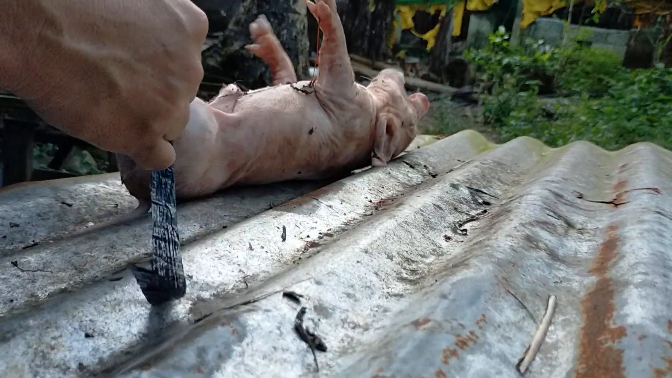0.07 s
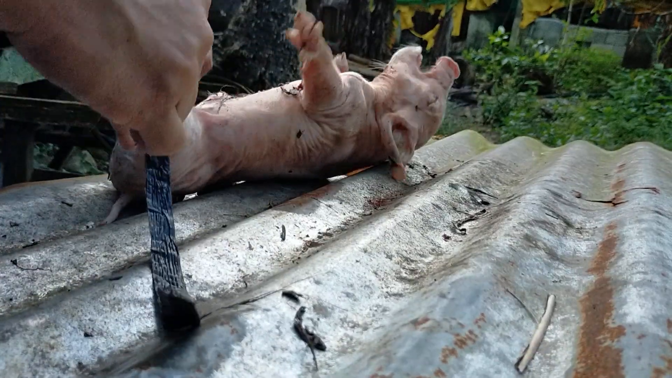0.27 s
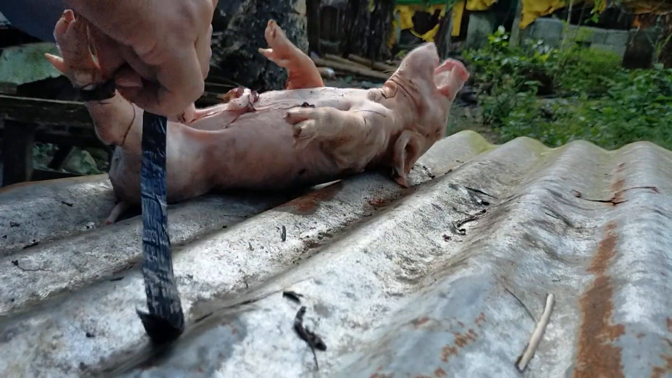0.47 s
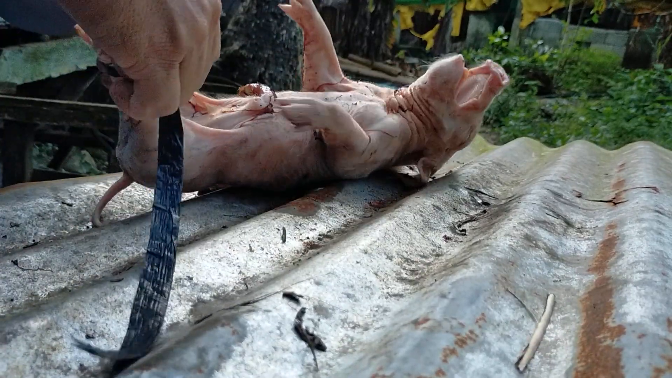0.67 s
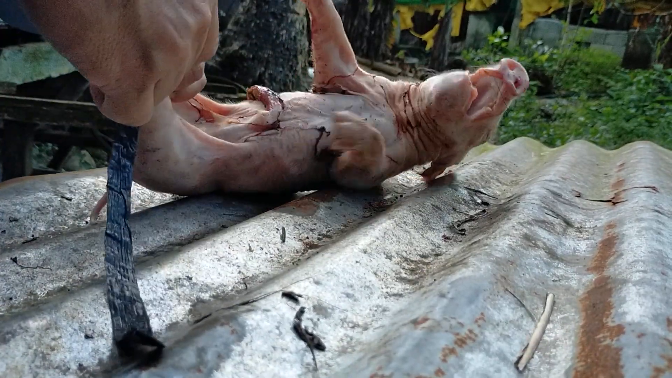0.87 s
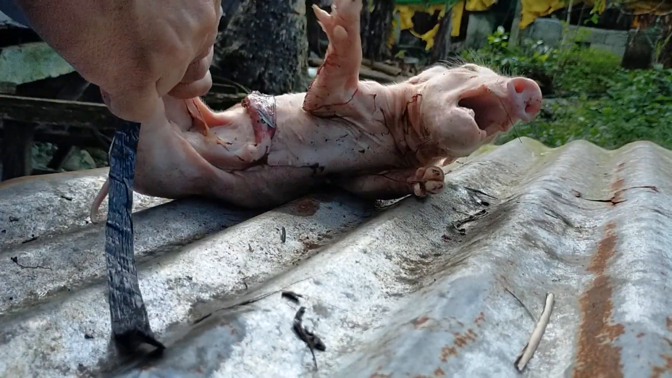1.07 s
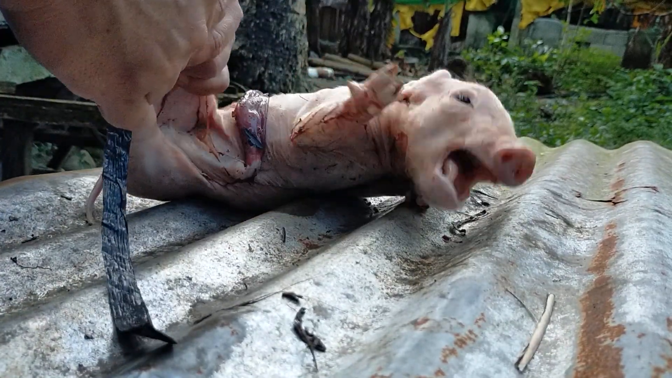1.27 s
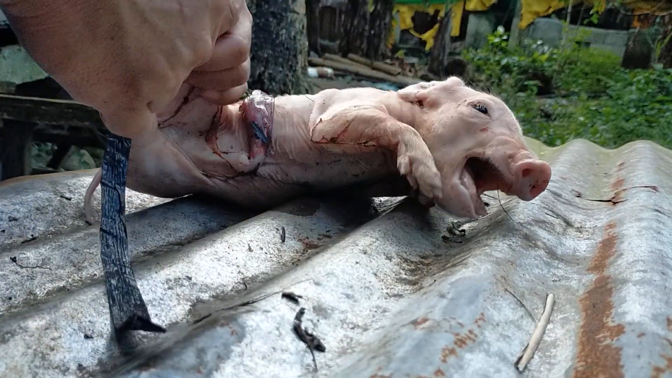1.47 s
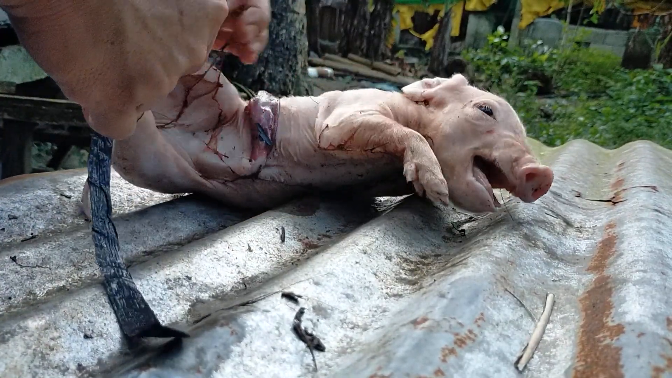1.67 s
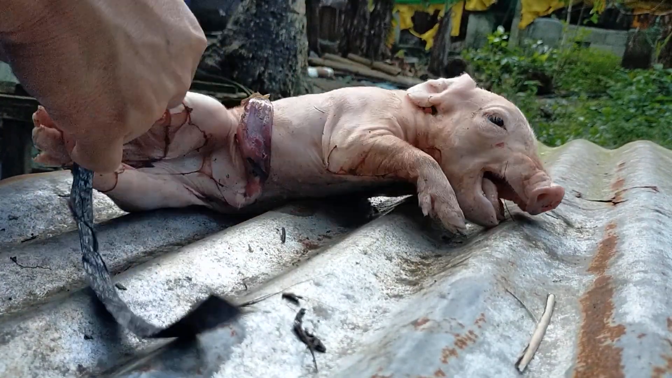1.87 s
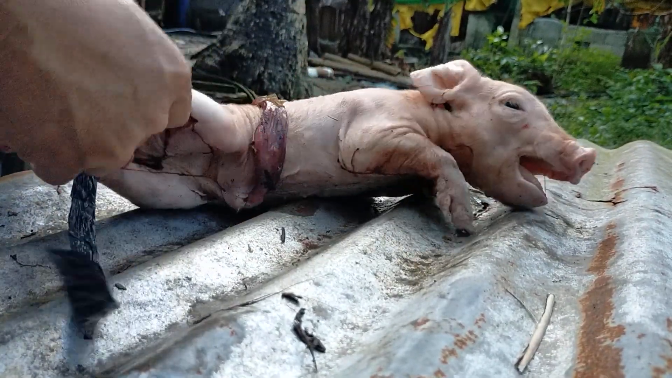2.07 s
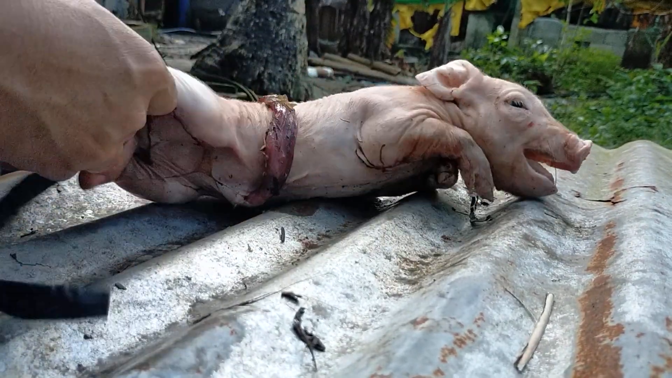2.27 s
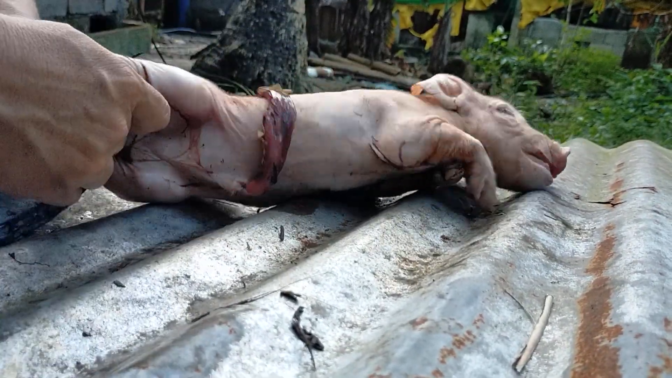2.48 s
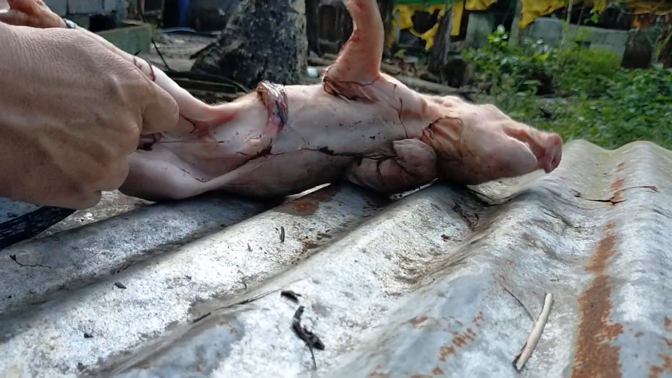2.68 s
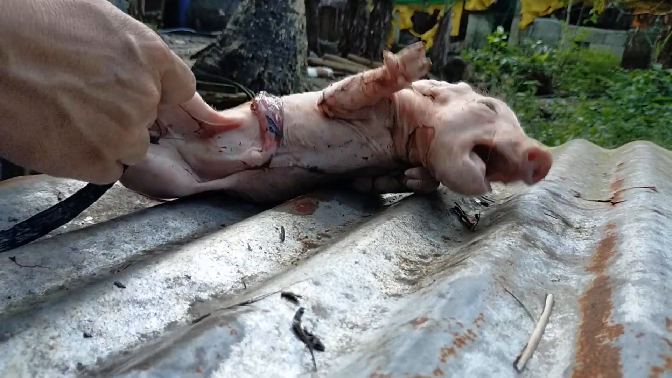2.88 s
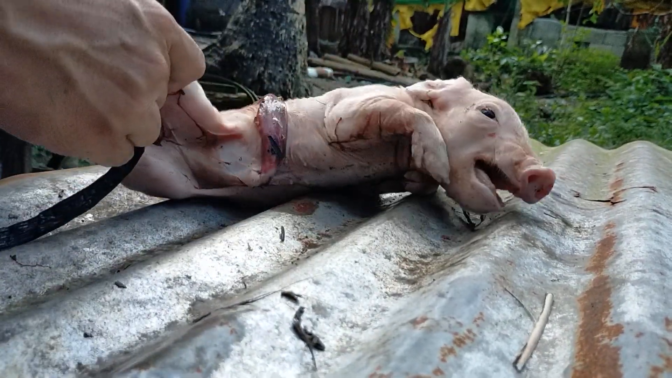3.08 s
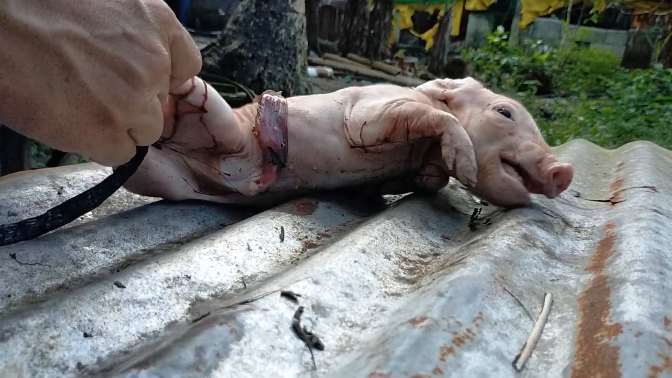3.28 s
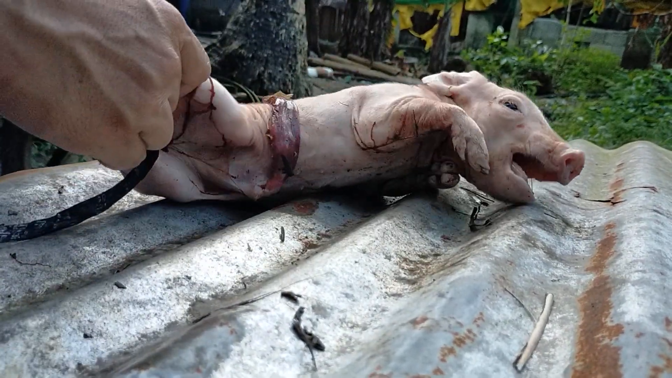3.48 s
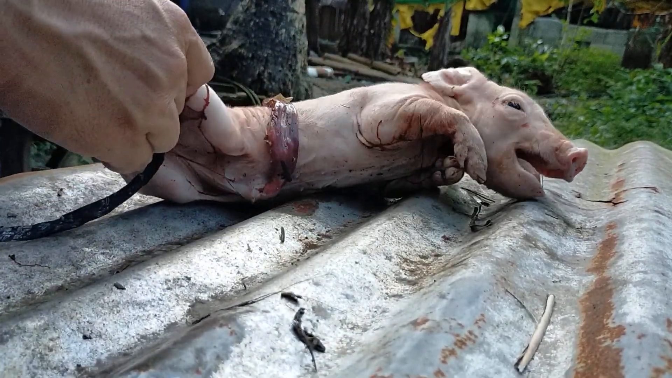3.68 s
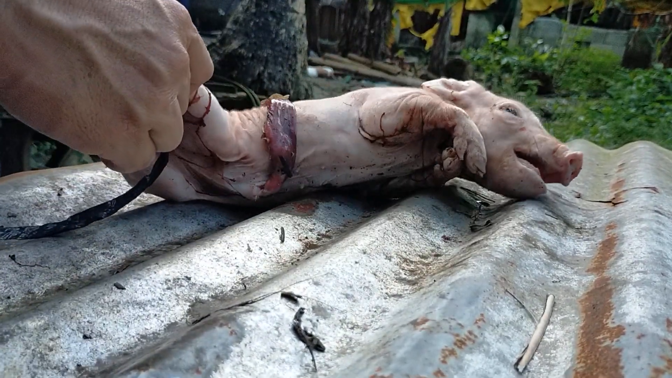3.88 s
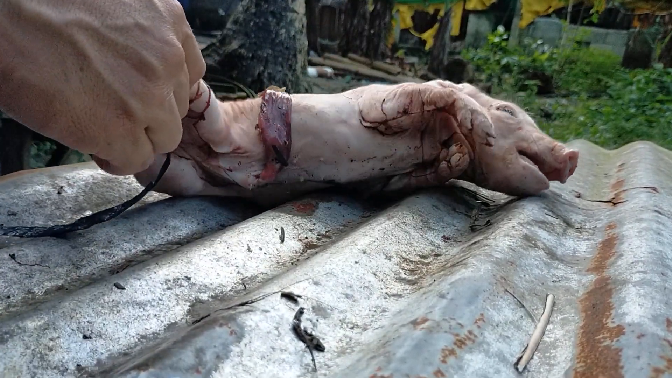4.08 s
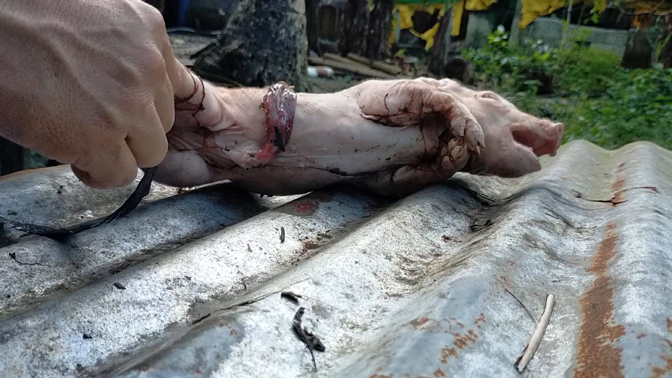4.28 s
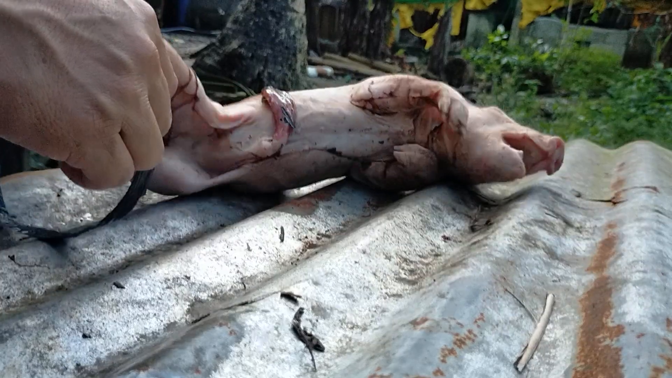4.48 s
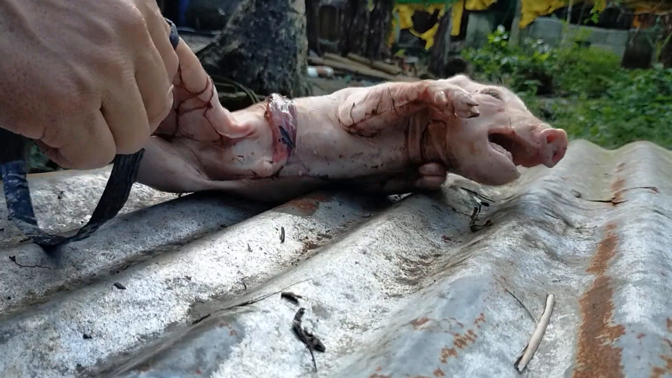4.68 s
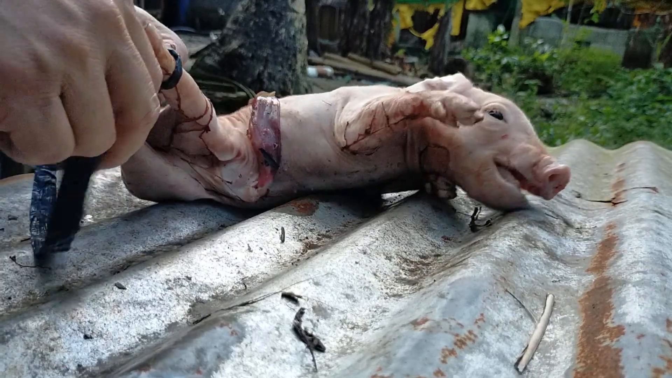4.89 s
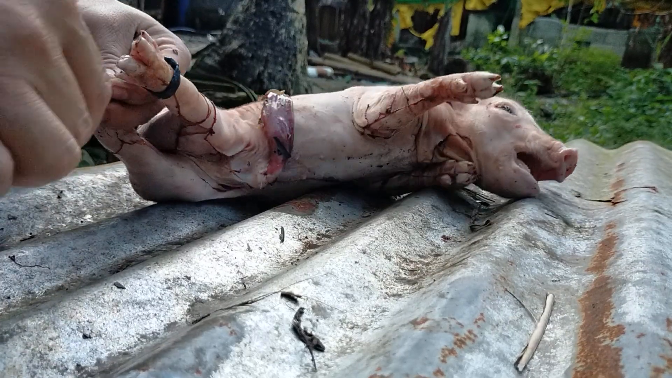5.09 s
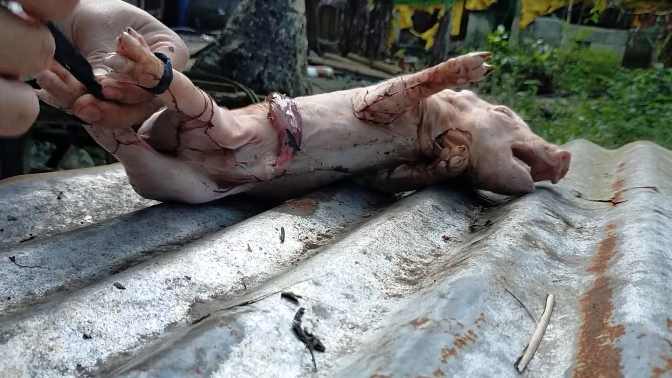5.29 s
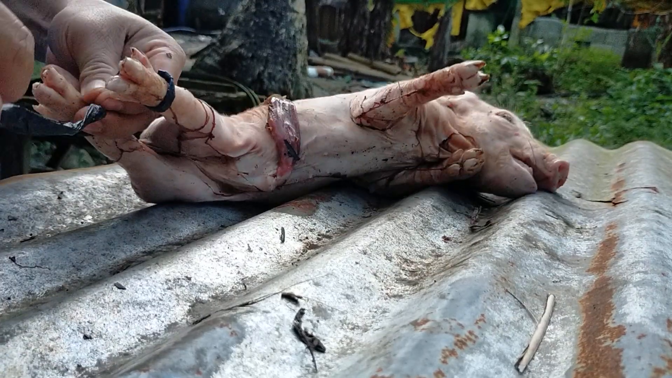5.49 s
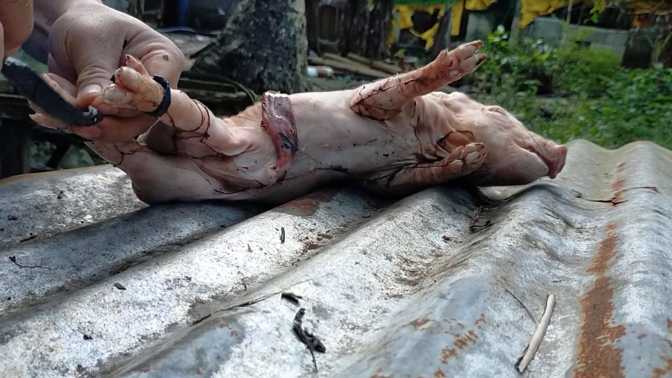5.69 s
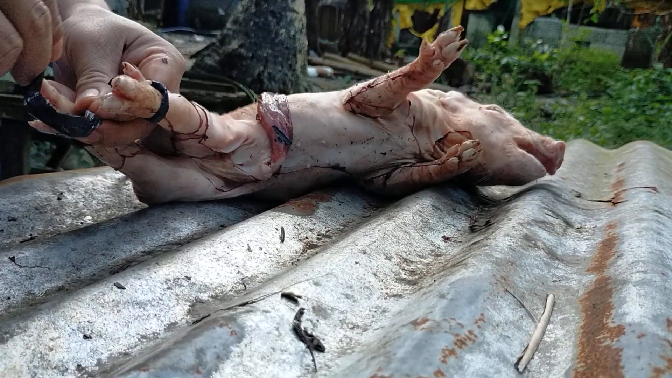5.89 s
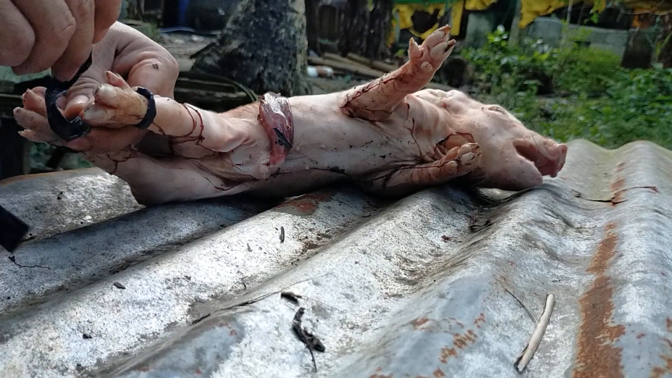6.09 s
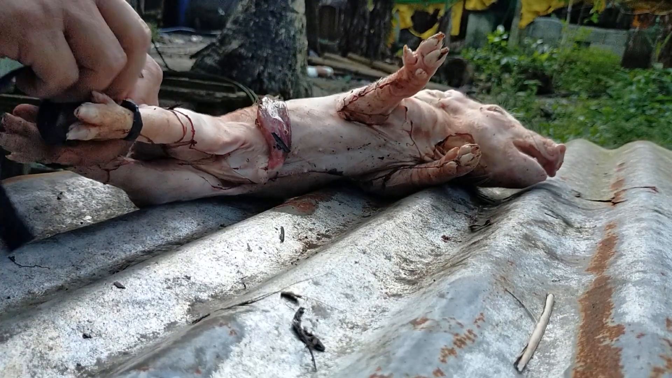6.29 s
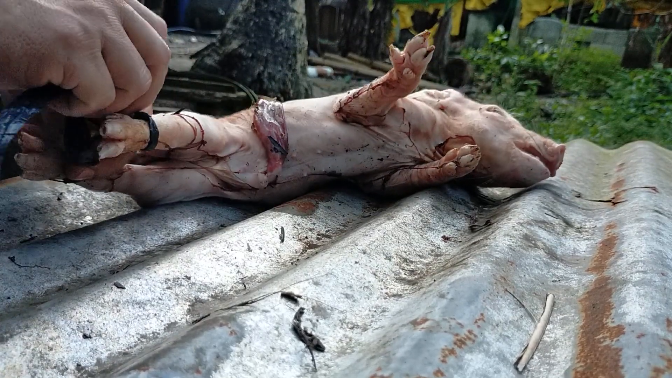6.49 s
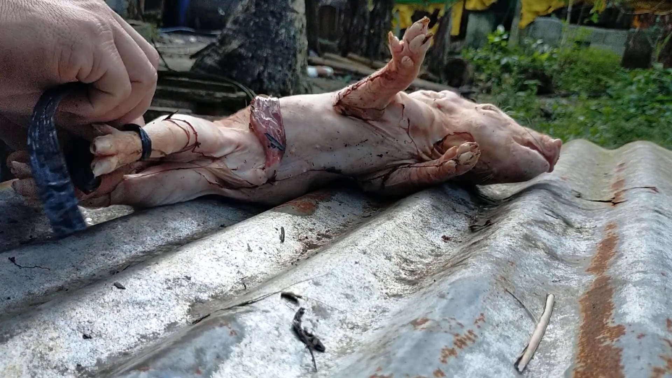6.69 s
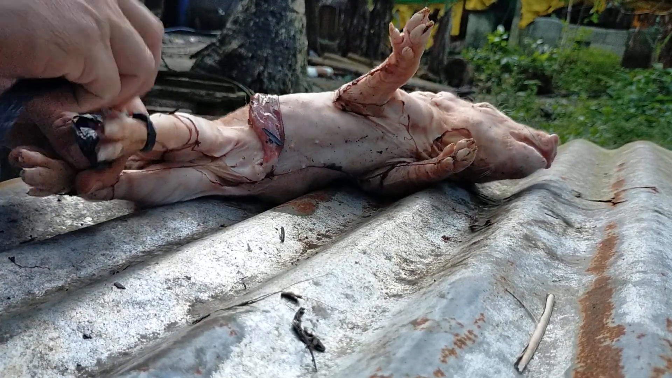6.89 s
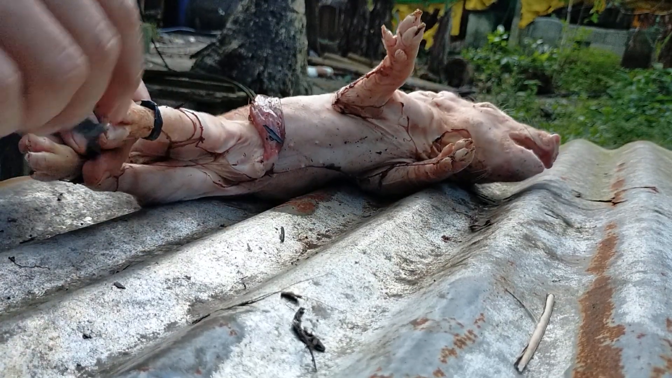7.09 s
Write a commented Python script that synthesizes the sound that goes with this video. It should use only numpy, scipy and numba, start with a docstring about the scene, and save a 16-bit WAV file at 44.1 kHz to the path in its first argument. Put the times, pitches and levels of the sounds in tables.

```python
"""Piglet squealing on a roofing sheet

A piglet held down on a corrugated sheet outdoors cries out again and again, close by.
Each cry is a creak of glottal pulses ringing mouth, nose and snout resonances. Most cries tighten
into a ringing squeal, and some squeals break into a rasp as extra pulses and leaking air come in.
Faint grunts are rough pulses; kicks ring sheet modes and noise bands; handling ticks are noise bursts.
Quick reflections, faint echoes, quiet air and a steady high hiss surround them."""
import sys
import numpy as np
from scipy import signal
from scipy.fft import rfft, irfft
from scipy.io import wavfile
from scipy.ndimage import uniform_filter1d, minimum_filter1d
from numba import njit

SR = 44100
rng = np.random.default_rng(int(sys.argv[2]) if len(sys.argv) > 2 else 0)


def inscribe(sig):
    """Save sig as 16-bit PCM at rate SR to the path in sys.argv[1].

    A 1-D sig is mono; a 2-D sig holds one channel per row.
    Samples are clipped to [-1, 1] before scaling.
    """
    pcm = np.round(np.clip(np.atleast_2d(sig).T, -1, 1) * 32767)
    wavfile.write(sys.argv[1], SR, pcm.astype(np.int16))


N = 314874
TIME = np.arange(N) / SR


def from_db(db):
    """Decibels to gain."""
    return 10 ** (np.asarray(db) / 20)


def rms_one(x):
    """Scale to unit power."""
    return x / np.sqrt(np.mean(x ** 2) + 1e-20)


def even(x, size=760):
    """Hold the power at one over a few pulses."""
    power = uniform_filter1d(uniform_filter1d(x * x, size), size)
    return x / np.sqrt(np.maximum(power, 0) + 1e-12)


def ramp(start, length):
    """From zero to one, starting at a given time."""
    return np.clip((TIME - start) / max(length, 1e-3), 0, 1)


def sounding(events, fade_s=0.0035):
    """One while any of the events lasts, with short fades."""
    gate = 0
    for start, length, *_ in events:
        inside_s = np.minimum(TIME - start, start + length - TIME)
        gate = gate + np.clip(inside_s / fade_s + 1, 0, 1)
    return gate


def band(x, hz, kind, order=2):
    """Butterworth filter."""
    sos = signal.butter(order, np.clip(hz, 10, .45 * SR), kind, fs=SR, output="sos")
    return signal.sosfilt(sos, x + 1e-18)


@njit
def glide(x, hz, width):
    """Two-pole resonance whose centre and width move; gain 1 on top."""
    y = np.zeros(len(x))
    for i in range(2, len(x)):
        r = np.exp(-np.pi * width[i] / SR)
        drive = (1 - r * r) / 2 * (x[i] - x[i - 2])
        y[i] = drive + 2 * r * np.cos(2 * np.pi * hz[i] / SR) * y[i - 1] - r * r * y[i - 2]
    return y


def resonate(x, hz, width):
    """Resonance with steady or moving centre and width."""
    return glide(x + 1e-18, hz + np.zeros(N), np.maximum(width, 3) + np.zeros(N))


def resonate_twice(x, hz, width, skirt):
    """A resonance then a broader one, which softens the attack and darkens the valleys."""
    return resonate(resonate(x, hz, width), hz, skirt)


def drift(rate_hz):
    """Smooth chance of spread about 1."""
    return rms_one(band(rng.standard_normal(N + SR), rate_hz, "low")[SR:])


def clicks(times, heights):
    """Single impulses."""
    out = np.zeros(N)
    np.add.at(out, np.clip((np.asarray(times) * SR).astype(int), 0, N - 1), heights)
    return out


def bursts(times, db, t60, edges_hz):
    """Noise in one band that starts at each hit and dies away."""
    decay = from_db(-60 / (t60 * SR))
    fall = signal.lfilter([1], [1, -decay], clicks(times, from_db(db)) + 1e-18)
    noise = band(fall * rng.standard_normal(N), edges_hz, "band", order=3)
    return noise * np.sqrt(SR / 2 / (edges_hz[1] - edges_hz[0]))


# Strain brightens and roughens together. Each row: relative treble in dB, rasp from 0 to 1.
STRAIN_RASP = [(-19, 0.01), (-8.5, .16), (-1, 0.6), (6, .85)]
# Air between slow pulses: share at cry start, share once settled.
AIR_AT_START, AIR_SETTLED = 0.43, 0.78
SHIMMER_DB = 1.5  # slow pulses come in uneven strengths


def squeals():
    """Glottal pulses ring the mouth, nose, throat and snout; slack folds also leak air."""
    rate, first_hz, level_db, second_db, treble_db, hiss_db, chest_db, settled, tongue = voice()
    rasp = np.clip(np.interp(treble_db, *np.transpose(STRAIN_RASP)), 0, 1)
    pulses, puffs = larynx(rate, rasp)
    # slow folds never seal
    slack = np.interp(rate, [110, 145], [1, 0])
    air_share = AIR_AT_START + (AIR_SETTLED - AIR_AT_START) * settled
    leak = slack * air_share * from_db(3.2 * drift(9)) * rng.standard_normal(N)
    hoarse = pulses + leak
    width = ring_width(rate, rasp)
    first = first_resonance(hoarse, puffs, first_hz, width, slack)
    second, second_db = second_resonance(hoarse, rate, rasp, first_hz, width, tongue, second_db)
    broad = throat(puffs, rasp, second_db)
    treble = from_db(treble_db) * snout(puffs + slack * hoarse / 4, first_hz, hiss_db)
    level = from_db(level_db + SHIMMER_DB * slack * drift(105)) * sounding(CRY_ROWS)
    mouth = level * (first + broad + from_db(second_db) * second + treble)
    return mouth + chest(hoarse, level, slack, chest_db)


# Fast, tight pulses change the ringing. Each row: pulses per s, base width of first resonance in Hz.
RING_WIDTHS = [(100, 105), (125, 140), (150, 65)]


def ring_width(rate, rasp, rasp_width_hz=650):
    """Resonance width set by pulse rate and broadened by rasp."""
    return np.interp(rate, *np.transpose(RING_WIDTHS)) + rasp_width_hz * rasp


# Nose resonance, fixed in pitch. Values: centre in Hz, width in Hz, level in dB re first resonance.
NOSE_RESONANCE = (2450, 520, -9)


def first_resonance(hoarse, puffs, first_hz, width, slack, skirt_hz=900, side_ratio=1.25,
                    side_db=(-19, -8, 3)):
    """Main mouth resonance, a side one that fills in as ringing is damped, and the creak's nose."""
    first = even(resonate_twice(hoarse, first_hz, width, skirt_hz + width))
    side_hz = side_ratio * first_hz
    side = even(resonate_twice(hoarse + puffs, side_hz, width, skirt_hz + 2 * width))
    first = first + from_db(np.interp(width, [150, 420, 750], side_db)) * side
    # tight throat: deeper valley below the resonance
    loose = even(band(first, 700, "high", order=4))
    tight = even(band(first, 1530, "high", order=4))
    first = even(loose * slack + tight * (1 - slack))
    nose_hz, nose_width, nose_db = NOSE_RESONANCE
    nose = even(resonate_twice(hoarse, nose_hz, nose_width, 2 * nose_width))
    return first + slack * from_db(nose_db) * nose


# Second resonance follows the mouth. Each row: first resonance in Hz, second resonance in Hz.
MOUTH_OPENING = [(1350, 1646), (1600, 3130), (1750, 3330), (2000, 3870), (2300, 4240), (2700, 5800)]
SECOND_WIDTH_HZ = 93  # on top of the first's width
SECOND_WAVER = .02    # share of centre


def second_resonance(hoarse, rate, rasp, first_hz, width, tongue, second_db,
                     rasp_hz=900, skirt_hz=1100, merged_db=(-12, -19)):
    """Climbs from the nose pitch to follow the mouth, wavering; returns signal and level in dB."""
    nose_hz = NOSE_RESONANCE[0]
    open_hz = np.interp(first_hz, *np.transpose(MOUTH_OPENING))
    waver = SECOND_WAVER * np.interp(rate, [230, 280], [1, .2]) * drift(22)
    hz = (nose_hz + tongue * (open_hz - nose_hz)) * (1 + waver)
    second = resonate_twice(hoarse, hz, width + SECOND_WIDTH_HZ + rasp_hz * rasp, skirt_hz + rasp_hz * rasp)
    # lying low, it merges with the first and stays strong
    second_db = np.maximum(second_db, np.interp(hz, [2700, 3300], merged_db))
    return even(band(second, 1740, "high")), second_db


# Broad throat band. Values: centre in Hz, width in Hz, level in dB re second resonance at full rasp.
THROAT_BAND = (3480, 630, 0)


def throat(puffs, rasp, second_db):
    """A rasp's air puffs stir a broad band."""
    hz, width, db = THROAT_BAND
    return rasp * from_db(second_db + db) * even(resonate_twice(puffs, hz, width, width))


# Upper resonances of throat and snout, in two pairs. Each row: base centre in Hz, width in Hz,
# level in dB relative within its pair.
SNOUT_RESONANCES = [(6300, 650, 0), (8100, 900, -1), (11800, 1800, -12), (14900, 1700, -5)]
SNOUT_FOLLOWS, SNOUT_AT_HZ = 0.2, 2340  # exponent of the lower pair's shift; mouth Hz of no shift


def snout(source, first_hz, hiss_db, top_db=-6):
    """Four upper resonances; the lower pair moves a little with the mouth, the upper is hiss."""
    shift = (first_hz / SNOUT_AT_HZ) ** SNOUT_FOLLOWS
    rings = []
    for k, (hz, width, db) in enumerate(SNOUT_RESONANCES):
        centre = hz * shift if k < 2 else hz
        sign = (-1) ** k
        rings.append(sign * from_db(db) * rms_one(resonate_twice(source, centre, width, 2 * width)))
    lower = even(band(rings[0] + rings[1], 5800, "high"))
    return lower + from_db(hiss_db + top_db) * even(rings[2] + rings[3])


def chest(hoarse, level, slack, chest_db, rel_db=-17, top_db=-46, slack_db=5, low_hz=150):
    """Weak low harmonics that stop growing once the cry is loud."""
    gain = from_db(top_db + slack_db * slack) * np.tanh(level * from_db(rel_db - top_db))
    return gain * from_db(chest_db) * even(band(hoarse, [low_hz, 1000], "band"))


def larynx(rate, rasp, puff_s=0.0015, snap=0.027, breathiness=0.38, wander=.01, jitter=.03):
    """Folds snap shut with a puff of air each cycle; strain adds a second snap between and leaks air."""
    # slow pulses are uneven, the fastest lock into a clear tone
    loose = np.interp(rate, [110, 200, 290], [1.3, .8, .1])
    unsteady = (wander + .1 * rasp) * drift(60) + (jitter + .2 * rasp) * drift(300)
    phase = np.cumsum(rate * (1 + loose * unsteady)) / SR
    snaps = np.diff(np.floor(phase), prepend=0)
    between = np.diff(np.floor(phase + .5), prepend=0)
    snaps = snaps + np.clip(2 * rasp - .7, 0, 1) * between
    snaps = snaps * from_db(2.5 * loose * rng.standard_normal(N))
    burst = signal.lfilter([1], [1, -np.exp(-1 / (puff_s * SR))], snaps + 1e-18)
    puffs = even(burst * rng.standard_normal(N))
    air = rng.standard_normal(N)
    pulses = even(snaps) + np.sqrt(rasp) * puffs + rasp * air
    breath = puffs + snap * even(snaps) + (breathiness + .5 * rasp) * air
    return pulses, breath


# Throat tightens: creak to squeal. Each row: start in seconds, length in seconds, release in seconds,
# gain in dB, second resonance gain in dB, top pulses per s, top mouth resonance in Hz, opening in seconds.
SQUEAL_ROWS = [(.437, 0.37, 0.027, 9.5, -8.5, 222, 2190, .19), (1.252, .33, .035, 9, -5.5, 185, 2360, .19),
               (1.978, .445, .028, 8.5, -5, 189.5, 2245, .115),
               (2.795, .21, 0.043, 15, -8.5, 165, 2174, .14), (3.539, .11, .045, 13, -4, 163, 2005, .04),
               (4.31, 0.23, .045, 18.5, -4.5, 195, 2650, .12),
               (7.039, 0.099, 0.033, 11.5, -5, 330, 2010, 0.047)]
TIGHTEN_S, SQUEAL_PULSES_PER_S = .024, 140  # onset time; pulse rate before the jaw opens
SQUEAL_TREBLE_DB = -4  # purer than the creak
# Squeal breaks into rasp. Each row: start in seconds, length in seconds, rise in seconds, level loss in dB,
# sag in dB per s, second resonance gain in dB, treble gain in dB.
RASP_ROWS = [(0.554, .25, 0.078, 7.5, -18, 15.5, 14), (1.336, 0.2, 0.042, 11, 0, 13, 20.5),
             (2.042, .372, .07, 6.5, 28.5, 7.5, 21), (2.862, .115, .08, 7, -21, 1, 12),
             (4.359, .172, .085, 11, -5, 5.5, 21)]
RASP_ENDS_S = .028
# Effort swells or sinks briefly. Each row: middle in seconds, half width in seconds, gain in dB.
PUSH_ROWS = [(.685, 0.033, -5), (.76, 0.089, 6), (1.995, 0.012, 3.5), (3.596, 0.016, 7), (4.232, 0.04, 6),
             (4.278, 0.021, 6.5), (4.53, .018, 6), (5.17, 0.028, -0.5), (5.211, 0.034, 3),
             (6.151, .03, -4.5), (6.206, 0.024, 1)]
PUSH_BRIGHTENS = 0.18  # share of a push added to the second resonance


def voice():
    """Voice controls as creaks tighten to squeals and break into rasps."""
    rate, mouth_hz, level_db, second_db, treble_db, *unchanged = creaks()
    for start, length, release, gain_db, second_gain_db, top_rate, top_hz, opening in SQUEAL_ROWS:
        held = 1 - ramp(start + length - release, release)
        tight, jaw = ramp(start, TIGHTEN_S) * held, ramp(start, opening)
        squeal_rate = SQUEAL_PULSES_PER_S + (top_rate - SQUEAL_PULSES_PER_S) * jaw ** 2
        rate = rate + tight * (squeal_rate - rate)
        mouth_hz = mouth_hz + jaw * held * (top_hz - mouth_hz)
        level_db = level_db + tight * gain_db
        second_db = second_db + tight * second_gain_db
        treble_db = treble_db + tight * SQUEAL_TREBLE_DB
    for start, length, rise, loss_db, sag, harsh_db, bright_db in RASP_ROWS:
        broken = ramp(start, rise) * (1 - ramp(start + length - RASP_ENDS_S, RASP_ENDS_S))
        level_db = level_db - broken * (loss_db + sag * (TIME - start))
        second_db = second_db + broken * harsh_db
        treble_db = treble_db + broken * bright_db
    for middle, half_width, gain_db in PUSH_ROWS:
        push_db = gain_db * (ramp(middle - half_width, half_width) - ramp(middle, half_width))
        level_db = level_db + push_db
        second_db = second_db + PUSH_BRIGHTENS * push_db
    return rate, mouth_hz, level_db, second_db, treble_db, *unchanged


# Cries as creaks. Each row: start in seconds, length in seconds, attack in seconds, release in seconds,
# creak level in dB, sag in dB per s, pulses per s once up to speed, mouth resonance at first in Hz, at last
# in Hz, then base trims in dB of second resonance, treble, hiss and chest.
CRY_ROWS = [(0, 0.092, 0.001, 0.098, -31.5, 38.5, 125, 1970, 2290, -1, -21, 6, 8),
            (.355, 0.44, .05, 0.0046, -24, 0.5, 105, 1805, 1810, -14, -16, -3.5, -2),
            (1.182, 0.39, 0.048, 0.0092, -23.5, 1.5, 125, 1830, 1820, -13.5, -13.5, 3, -3),
            (1.872, .553, 0.055, .018, -26.5, -0.5, 108, 1700, 1830, -5, -13, 4.5, 3),
            (2.69, 0.3, 0.061, .012, -28, -1.5, 105, 1787, 2015, -8, -16, 1.5, -6),
            (3.307, 0.35, .065, 0.061, -26.5, 2.5, 108, 1400, 2020, -4, -17, 3, 0.5),
            (4.098, 0.46, 0.033, 0.017, -27.5, 0, 115, 1643, 2121, -8, -20, 1, -3),
            (4.999, 0.37, 0.021, 0.11, -25, 21, 103, 1506, 2080, -7, -22, 8.5, 3),
            (5.83, 0.4615, 0.063, 0.073, -24.5, 30, 100, 1440, 2020, -9.5, -19.5, 3, 0.5),
            (6.845, 0.3, 0.053, 0.0099, -36, -4, 106, 1347, 2100, -6.5, -22.5, 11, 2.5)]
ATTACK_DB, RELEASE_DB = 16.5, 16    # how far below its level a cry starts and ends
SLOW_START, SPEED_UP_S = .38, .055  # share by which pulses start slower; catch-up time
AIR_SETTLES_S = 0.062
BREATHY_FADE = .3                   # share of a cry's fading that the treble escapes
TREBLE_LATE_DB, CHEST_LATE_DB = 6, 4  # treble and chest come in late
SHUT_HZ = 126                       # mouth resonance drop at the end
TONGUE_WAITS_S, TONGUE_LIFTS_S = .03, .1  # when the second resonance leaves the nose pitch


def creaks():
    """Cries swell and die; pulses speed up, air settles, the mouth resonance glides, then drops."""
    controls = np.zeros((9, N))
    for (start, length, attack, release, db, sag, rate, first_hz, last_hz,
         second_db, treble_db, hiss_db, chest_db) in CRY_ROWS:
        age = np.maximum(TIME - start, 0)
        ending = ramp(start + length - release, release)
        settled = 1 - np.exp(-age / AIR_SETTLES_S)
        tongue = ramp(start + TONGUE_WAITS_S, TONGUE_LIFTS_S)
        fade_db = ATTACK_DB * (1 - ramp(start, attack)) + sag * age + RELEASE_DB * ending
        cry = [rate * (1 - SLOW_START * np.exp(-age / SPEED_UP_S)),
               first_hz + (last_hz - first_hz) * ramp(start, length) - SHUT_HZ * ending,
               db - fade_db,
               np.full(N, second_db),
               treble_db + BREATHY_FADE * fade_db - TREBLE_LATE_DB * (1 - tongue),
               np.full(N, hiss_db),
               chest_db - CHEST_LATE_DB * (1 - settled),
               settled, tongue]
        begun = np.searchsorted(TIME, start - .02)
        controls[:, begun:] = [c[begun:] for c in cry]
    return controls


# Soft grunts. Each row: start in seconds, length in seconds, chest in dB, nasal in dB, fade in dB per s.
GRUNT_ROWS = [(0.802, 0.068, -39, -39, 190), (0.996, 0.21, -38.5, -42, 95), (3.658, 0.061, -44, -41, 158),
              (4.548, 0.112, -48.5, -49, 126), (4.913, 0.093, -45, -53, -2), (5.599, 0.27, -45, -52.5, -3),
              (6.301, 0.077, -43.5, -54, -15), (6.372, 0.139, -40, -42.5, 99),
              (6.717, 0.098, -44, -48, 138)]
GRUNT_ATTACK_S = 0.022


def grunts(rate_hz=72):
    """Slack, rough pulses through chest and nose."""
    pulses, puffs = larynx(rate_hz + np.zeros(N), .45)
    rough = pulses + puffs
    low = resonate(rough, 193.0, 323.9) - .5 * resonate(rough, 900, 640)
    low = even(band(low, [200, 1500], "band"))
    high = resonate(puffs, 1900, 1650) - 2 * resonate(puffs, 2990, 170)
    high = even(band(high, [1000, 4800], "band"))
    out = 0
    for start, length, low_db, nose_db, fade in GRUNT_ROWS:
        fading = from_db(-fade * length * ramp(start, length))
        shape = sounding([(start, length)]) * ramp(start, GRUNT_ATTACK_S) * fading
        out = out + shape * (from_db(low_db) * low + from_db(nose_db) * high)
    return out


# Blows on the sheet. Each row: time in seconds, blow level in dB, then knock, bass and rattle trims in dB.
KICK_ROWS = [(0.031, -30, -5, -2.5, -14), (0.304, -7, 5, -11, -17), (2.314, -32, -1, -12, -2),
             (2.455, -16, -7, -14.5, -12.5), (2.592, -16.5, -1.5, -22, -7.5), (2.767, -20.5, 0, -7.5, -27),
             (3.293, -28, -3, -26, -6.5), (4.317, -27, -1.5, 2, -6), (4.789, -41, -1, 7, -29),
             (6.126, -34, -2, -9, -5.5), (6.304, -28, -6, -12, -21), (6.689, -25.5, -2, -18, -19)]
# Modes of the damped sheet. Each row: frequency in Hz, relative level in dB, t60 in seconds.
SHEET_MODES = [(145, -26, 0.24), (304, -2, 0.031), (405, -19.5, 0.086)]
KICK_SPREAD_DB = 1.5  # chance per mode and blow


def kicks(soft_hz=680, rumble_db=-15.5, rumble_t60=0.31, rattle_db=-9.0, rattle_t60=0.47,
          bass_db=-10.5, bass_t60=0.39):
    """A soft blow rings the sheet's modes; the sheet rumbles, rattles on its support and sways."""
    s, blow_db, knock_db, sway_db, loose_db = np.transpose(KICK_ROWS)
    modes = 0
    for hz, db, t60 in SHEET_MODES:
        width = np.log(1000) / (np.pi * t60)
        spread_db = rng.normal(0, KICK_SPREAD_DB, len(s))
        touch = clicks(s, from_db(blow_db + knock_db + db + spread_db))
        modes = modes + resonate(touch, hz, width) * SR / (2 * np.pi * width)
    rumble = bursts(s, blow_db + rumble_db, rumble_t60, [170, 600])
    rattle = bursts(s, blow_db + loose_db + rattle_db, rattle_t60, [500, 1250])
    bass = bursts(s, blow_db + sway_db + bass_db, bass_t60, [35, 140])
    return band(modes, soft_hz, "low") + rumble + rattle + bass


# Handling ticks. Each row: time in seconds, snap level in dB.
TICK_ROWS = [(0.3113, -22), (0.3274, -16.5), (0.3422, -11), (0.4548, -12.5), (1.0015, -24.5),
             (1.0783, -26.5), (1.7644, -39), (4.8612, -27.5), (4.9801, -23.5), (5.5743, -26),
             (6.0666, -21.5), (6.3185, -31), (6.78, -28.5), (6.8794, -18.5), (6.9009, -18)]
SMALL_TICKS_PER_S, SMALL_TICK_MIN_DB, SMALL_TICK_RANGE_DB = 9, -38, 7  # fainter, at random


def ticks(t60=0.026, scrape_db=-11, snap_t60=0.00066):
    """Tiny sharp snaps and bright scrapes of strap and hoof."""
    chance = rng.random((int(SMALL_TICKS_PER_S * N / SR), 2))
    small = [(when * N / SR, SMALL_TICK_MIN_DB + SMALL_TICK_RANGE_DB * size) for when, size in chance]
    s, snap_db = np.transpose(list(TICK_ROWS) + small)
    scrapes = bursts(s, snap_db + scrape_db, t60, [3800, 16000])
    return scrapes + bursts(s, snap_db, snap_t60, [12000, 16000])


def yard(x, near_db=-17, near_t60=0.075, far_db=-26, far_t60=0.32, dull_hz=4500):
    """Quick reflections off the sheet, then faint dull echoes from walls and trees."""
    t = TIME[:SR // 2]
    scatter = rng.standard_normal((2, len(t))) * (rng.random((2, len(t))) < .05)
    near = scatter[0] * from_db(-60 * t / near_t60) * (t > .002)
    far = scatter[1] * from_db(-60 * t / far_t60) * (t > .015)
    far = band(far, dull_hz, "low", order=1)
    response = from_db(near_db) * near / np.linalg.norm(near)
    response = response + from_db(far_db) * far / np.linalg.norm(far)
    return signal.fftconvolve(x, response)[:N]


# Spectrum of the outdoor air before the low-pass. Each row: frequency in Hz, relative density in dB.
AIR_SPECTRUM = [(15, -57), (25, 5.5), (127, -1.5), (476, -9.5), (840, -11), (988, -15.5), (2050, -12.5),
                (2990, -17.5), (4030, -20), (6560, -29.5), (7310, 6.5), (8360, -11.5), (14800, -6),
                (16000, -19)]
AIR_RMS_DB = -50.5
# Narrow bands of steady hiss. Each row: centre in Hz, width in Hz, rms in dB.
HISS_BANDS = [(7070, 530, -59.5), (10420, 1400, -58), (14700, 1500, -57)]


def background(top_hz=6000):
    """Quiet outdoor air, noise shaped by spectrum, with narrow bands of high hiss."""
    hz, db = np.transpose(AIR_SPECTRUM)
    bins_hz = np.maximum(np.arange(N // 2 + 1) * SR / N, 1)
    shape = from_db(np.interp(np.log(bins_hz), np.log(hz), db))
    air = irfft(rfft(rng.standard_normal(N)) * shape, N)
    out = from_db(AIR_RMS_DB) * rms_one(band(air, top_hz, "low"))
    for hz, width, db in HISS_BANDS:
        out = out + from_db(db) * rms_one(resonate_twice(rng.standard_normal(N), hz, width, width))
    return out


def scene():
    """The piglet and the sheet, close by in an open yard."""
    close = squeals() + grunts() + kicks() + ticks()
    return (close + yard(close) + background())[None]


def record(dry, ceiling=0.42, cutoff_hz=16000):
    """A fast limiter holds the peaks; the top is cut."""
    gain = np.minimum(1, ceiling / (np.abs(dry) + 1e-9))
    gain = uniform_filter1d(minimum_filter1d(gain, size=130), size=130)
    return signal.sosfilt(signal.ellip(10, .1, 80, cutoff_hz, fs=SR, output="sos"), dry * gain)


dry = scene()
out = record(dry)
inscribe(out)
```